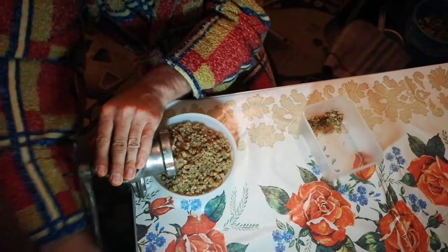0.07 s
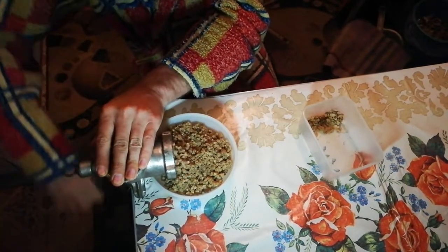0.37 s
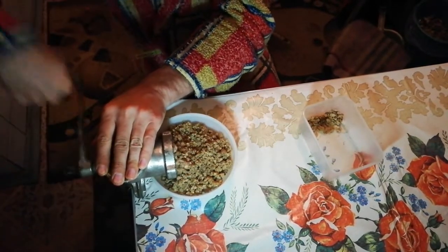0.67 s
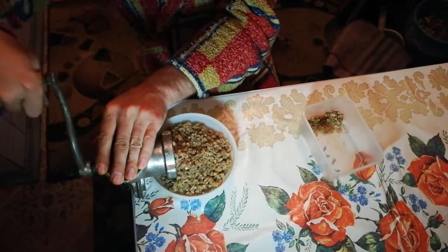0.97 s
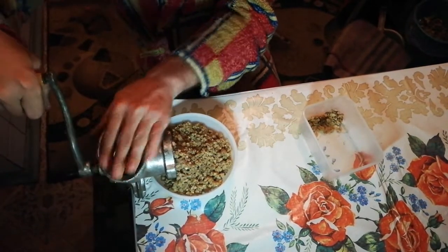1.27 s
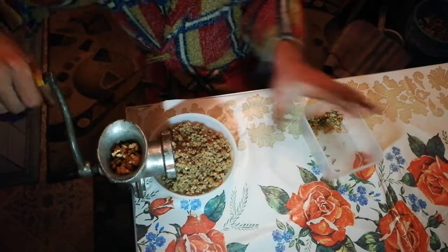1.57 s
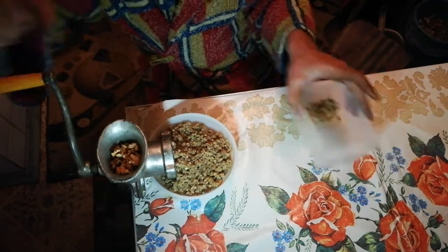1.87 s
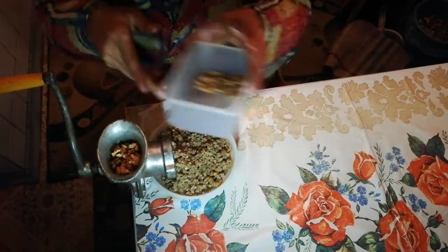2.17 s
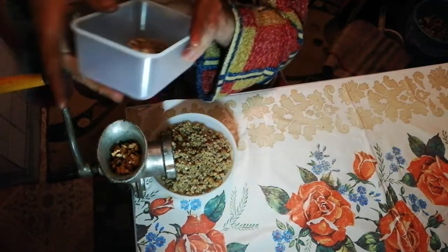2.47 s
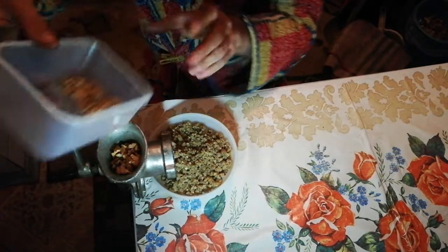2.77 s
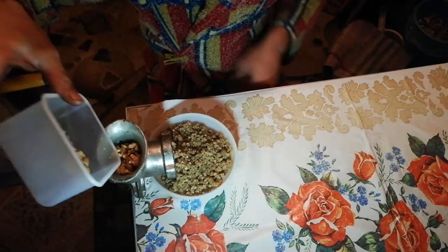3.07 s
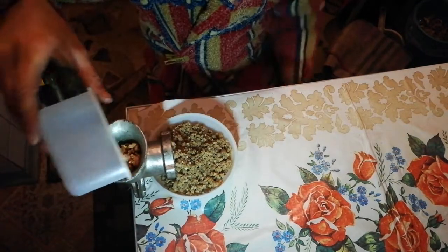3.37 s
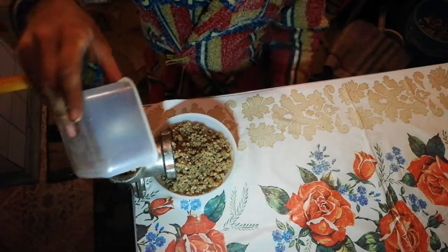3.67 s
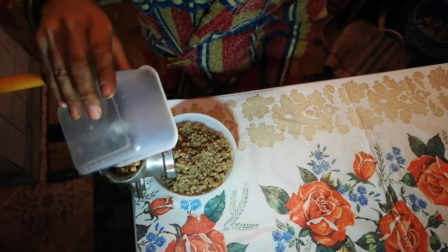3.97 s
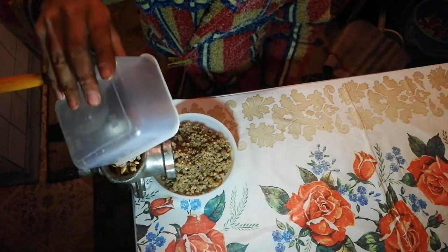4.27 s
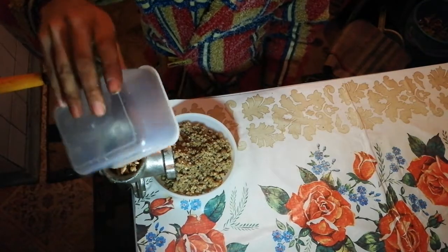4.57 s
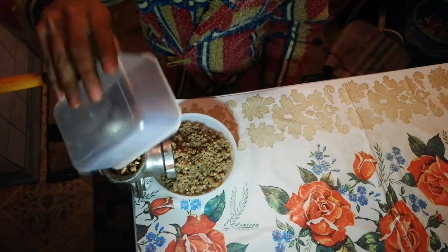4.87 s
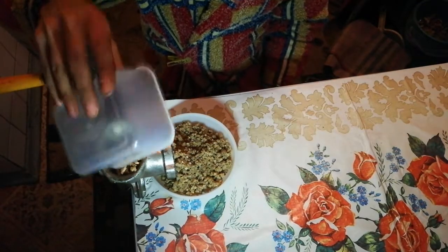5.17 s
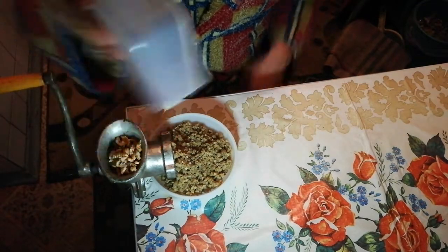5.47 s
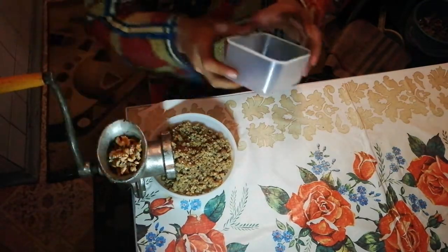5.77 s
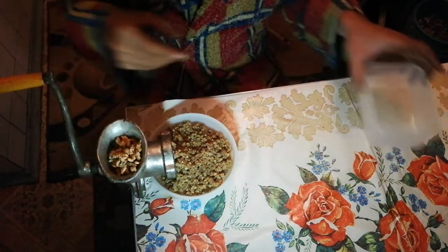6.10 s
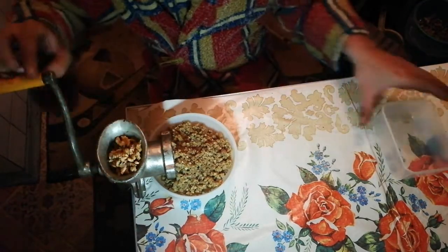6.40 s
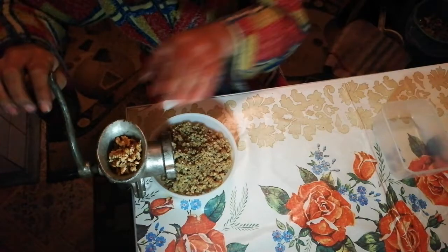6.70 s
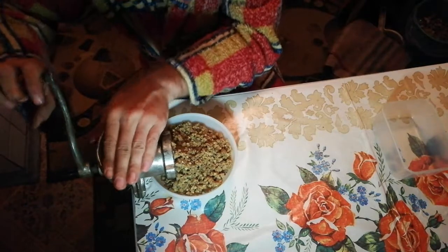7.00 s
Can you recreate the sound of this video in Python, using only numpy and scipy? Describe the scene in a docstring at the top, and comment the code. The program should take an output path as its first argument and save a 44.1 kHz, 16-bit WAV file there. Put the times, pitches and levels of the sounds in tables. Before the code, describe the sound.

For the first 1.5 seconds a hand-cranked grinder crushes walnuts in soft swells of crunching and low table rumble, with brittle cracks thickest around 0.9 seconds and a sleeve rustling close by. At 1.7 seconds a plastic tub is picked up with a light bump. Nuts shift inside it, then slide, click and rattle into the metal hopper, most strongly from 3.1 to 3.5 seconds, trailing off by 4.1. Between 4.6 and 5.2 seconds the tub is knocked on the hopper four times, hollow and briefly ringing, the last three loudest. A very faint low hum swells around 6 seconds. At 6.25 the tub lands on the cloth-covered table with a loud, hollow thud and a quick clack. Grinding resumes from 6.6 seconds, with a crack near 7.2. The stereo microphone is close, in a small, quiet kitchen with short reflections and a faint appliance hum.

```python
"""A cast meat grinder clamped to a kitchen table crushes walnuts: shells of sound rise with each push on the
crank, as brittle fracture and table rumble, while a sleeve rustles. From 1.7 s the cook lifts a plastic tub
and slides its nuts into the metal hopper; their impacts excite the thin wall. From 4.6 s four knocks set
the tub's modes ringing. A low drone swells, the tub lands on the cloth at 6.25 s, and cranking resumes.
A close stereo microphone hears it all, with the reflections of a small, quiet kitchen."""
import sys
import numpy as np
from scipy import signal
from scipy.fft import rfft, irfft
from scipy.io import wavfile
from scipy.ndimage import map_coordinates

SR = 44100
rng = np.random.default_rng(int(sys.argv[2]) if len(sys.argv) > 2 else 0)


def wav_record(signal):
    """Record a signal, one row per channel, as 16-bit PCM in the file named by sys.argv[1]."""
    frames = np.transpose(np.atleast_2d(signal))
    bounded = np.clip(frames, -1, 1)
    # unit amplitude maps onto the largest positive 16-bit level
    quanta = np.round(bounded * 32767).astype(np.int16)
    wavfile.write(sys.argv[1], SR, quanta)


N = 319284
TIME = np.arange(N) / SR
HIT_TIME = TIME[:SR // 2]


# Pushes on the crank: t/s of peak, build-up/s, rumble level/dB, crunch level/dB (all levels are relative)
PUSHES = [(.05, 0.38, -46.5, -58.5), (.27, 0.3, -53.5, -71), (.56, 0.24, -55.5, -61.5),
          (.92, 0.3, -44.5, -52.5), (1.29, 0.56, -52.5, -92), (1.5, 0.038, -64, -65),
          (6.6, 0.26, -63.5, -76), (7.01, 0.052, -63, -59), (7.09, 0.063, -57, -66),
          (7.23, .15, -52.5, -52)]
# Spectra of the table's rumble and the auger's crunch: f/Hz, level/dB
RUMBLE_SPECTRUM = [(25, -18), (55, -20), (90, -6.5), (135, 1.5), (190, -2.5), (260, -12), (450, -18),
                   (900, -66)]
CRUNCH_SPECTRUM = [(60, -35), (200, -12), (450, -10), (950, 7.5), (1700, 3.5), (2600, -4.5), (4200, -4),
                   (6500, -9), (12000, -52)]
def grinder():
    """Forced vibration: the auger loads the nuts until they give way, and shakes the table."""
    rumble = swells([(s, build_s, db) for s, build_s, db, _ in PUSHES], release_s=.16)
    crunch = swells([(s, build_s, db) for s, build_s, _, db in PUSHES], release_s=.067)
    out = unit(colour(rng.standard_normal(N), RUMBLE_SPECTRUM)) * rumble * undb(-5)
    out += unit(colour(grains(900, 3.8, N), CRUNCH_SPECTRUM)) * crunch * undb(-.5)
    return out + fractures() + table_sway()


# Nuts breaking and the crank knocking: t/s, level/dB, f/Hz
CRACKS = [(.291, -58, 1050), (.636, -52.5, 1200), (.648, -50, 1130), (.711, -53, 780), (.795, -57, 1400),
          (.838, -45, 2380), (.873, -48.5, 2840), (.888, -45.5, 1480), (.905, -47.5, 980),
          (1.102, -46.5, 820), (1.199, -49, 2190), (1.263, -45.5, 1130), (1.292, -54, 1510),
          (1.553, -48.5, 1480), (6.603, -63, 1700), (6.791, -64.5, 1780), (7.2, -44.5, 2420)]
# Dry, bright sprays of splinters: t/s, level/dB
SPLINTERS = [(.242, -52.5), (.886, -45), (6.903, -55), (7.201, -50.5)]
# Response of the casting and spectrum of a hard tick: f/Hz, level/dB
CASTING_RESPONSE = [(450, 4), (920, 4), (1150, 0), (1500, 2), (1900, 0), (2500, 0.5), (3200, 2.5),
                    (3800, 3.5), (4600, -3), (8000, -38)]
TICK_SPECTRUM = [(80, -43.5), (800, -5), (2500, -8), (4200, -1.5), (6000, -2), (8300, -2), (10500, -17),
                 (15500, -24.5)]
def fractures():
    """Brittle fracture: big pieces break low, crumble long and shake the table; small ones snap high."""
    out = np.zeros(N)
    for s, db, hz in CRACKS:
        force = contact(scatter_s=.018 / 2 ** (1.9 * octaves(hz)))
        crack = burst(colour(band(force, hz, width_share=1.1), CASTING_RESPONSE), db)
        tick = burst(colour(force, TICK_SPECTRUM), db - 21.5)
        add(out, s, crack + tick + thump(db - .5 - 2.5 * octaves(hz)))
    for s, db in SPLINTERS:
        add(out, s, burst(colour(contact(scatter_s=.011), TICK_SPECTRUM), db))
    return out


def table_sway(hz=62, t60_s=.25):
    """Damped free vibration: the table sways as a hard nut gives way."""
    out = np.zeros(N)
    sway = np.sin(2 * np.pi * hz * HIT_TIME) * undb(-60 * HIT_TIME / t60_s)
    add(out, s=.895, x=burst(sway, db=-40.5))
    return out


# Spectrum of the struck table top: f/Hz, level/dB
THUMP_SPECTRUM = [(30, -41.5), (55, -6.5), (95, -6), (140, 5), (210, -2.5), (330, -5.5), (520, -25.5),
                  (1200, -45)]
def thump(db):
    """Impact excitation: the table top answers a blow with a short, low boom."""
    return burst(colour(contact(scatter_s=.011), THUMP_SPECTRUM), db)


# Tub knocked on the hopper: t/s, blow level/dB, ring level/dB, rim tick level/dB, thump level/dB
KNOCKS = [(4.5998, -38.5, -36.5, -55.5, -59), (4.780, -26, -29.5, -36, -52.5),
          (4.9876, -24.5, -25, -38, -44.5), (5.198, -23.5, -33.5, -35, -45.5)]
# Spectra of the rim's tick and the blow of the tub's floor: f/Hz, level/dB
RIM_SPECTRUM = [(100, -43), (1500, -13.5), (3000, -3), (5000, 3), (8300, -4), (10500, -10), (15500, -24.5)]
BLOW_SPECTRUM = [(30, -26), (60, -18.5), (150, -26), (300, -7), (400, -3.5), (490, -13), (620, -3),
                 (1020, -1), (1480, -14.5), (2100, -7.5), (2600, -20.5), (4000, -23), (9000, -63)]
def knocks():
    """Elastic impact: the rim ticks on the hopper; the tub's floor flexes a moment later and rebounds."""
    out = np.zeros(N)
    for s, db, _, tick_db, thump_db in KNOCKS:
        add(out, s, burst(colour(contact(scatter_s=.003), RIM_SPECTRUM), tick_db) + thump(thump_db))
        add(out, s + .001, burst(colour(contact(), BLOW_SPECTRUM), db - 2))
        add(out, s + .004, burst(colour(contact(scatter_s=.0007), BLOW_SPECTRUM), db - 14))
    return out


# Tub bumped and set down on the cloth: t/s, blow level/dB, thump level/dB
LANDINGS = [(1.709, -51, -47), (2.178, -71, -55), (2.384, -54, -54.5), (6.2509, -24.5, -56.5),
            (6.257, -34.5, -39.5), (6.364, -34, -37.5)]
# Spectrum of a cushioned blow: f/Hz, level/dB
SOFT_BLOW_SPECTRUM = [(80, -10), (200, -1.5), (320, 5), (550, -1), (1000, 2.5), (1400, -1), (2000, -20),
                      (3500, -28), (8000, -30), (15000, -49)]
def landings():
    """Cushioned impact: cloth dulls the blow and the table booms; the rim clacks as the tub tips flat."""
    out = np.zeros(N)
    for s, db, thump_db in LANDINGS:
        add(out, s, burst(colour(contact(), SOFT_BLOW_SPECTRUM), db - 5) + thump(thump_db))
    rim_clack = tub_hit(db=-45, tick_db=-36, hz=2600, scatter_s=.0025)
    add(out, 6.3405, rim_clack)
    return out


# Modes of the tub held on the hopper and standing on the table: f/Hz, level/dB, t60/s
HELD_MODES = [(285, -19, .35), (398, 2, .27), (490, -16, .2), (608, -8, .27), (651, -10, .36),
              (720, -11, .3), (800, -8, .28), (976, -5, .26), (1220, -11, .2), (1570, -13, .2),
              (1690, -14, .18), (1820, -12, .2), (2130, -14, .18), (2815, -20, .2)]
STANDING_MODES = [(194.4, -2, 0.44), (326, 17, 0.12), (610, 5, 0.32), (790, 0, 0.42), (1017, -7, 0.42),
                  (1200, -8, 0.38), (1307, 5.5, 0.23)]
def tub_ringing():
    """Normal modes: the hollow tones that linger after a blow depend on how the tub is supported."""
    out = np.zeros((2, N))
    for s, _, ring_db, *_ in KNOCKS:
        add(out, s, ring(HELD_MODES, ring_db))
    for s, db, _ in LANDINGS:
        add(out, s, ring(STANDING_MODES, db - 6))
    return out


# Slides, one per tilt of the tub: t/s of peak, build-up/s, tumbling level/dB, hiss level/dB
SLIDES = [(1.86, 0.044, -54, -75), (1.933, 0.077, -47, -57), (2.291, 0.04, -54, -61.5),
          (2.42, 0.053, -46.5, -58), (2.55, 0.14, -56.5, -63.5), (3.03, 0.067, -53.5, -68),
          (3.12, 0.099, -48, -57.5), (3.225, 0.096, -38.5, -52), (3.49, 0.39, -47.5, -60),
          (3.589, 0.14, -51.5, -51), (3.831, 0.16, -49, -56.5), (3.914, 0.076, -53.5, -49),
          (4.06, .1, -68, -67)]
# A finger or a single nut strikes the tub: t/s, level/dB, f/Hz
TUB_CLICKS = [(1.901, -47, 1500), (1.961, -37, 1200), (2.551, -52.5, 1490), (3.078, -45, 2300),
              (3.138, -47, 935), (3.163, -36.5, 940), (3.173, -42.5, 3160), (3.192, -41.5, 2970),
              (3.221, -42, 3350), (3.232, -41, 3600), (3.297, -42.5, 2040), (3.341, -45, 1500),
              (3.658, -51, 960), (5.628, -64, 930), (5.827, -44, 1250)]
# A jolt lands a handful at once: t/s, wall level/dB, tick level/dB
CLATTERS = [(1.707, -48.5, -48.5), (2.179, -47, -62.5), (2.384, -42.5, -44), (3.003, -49, -52),
            (3.098, -50, -45), (3.383, -39.5, -38), (3.567, -54, -45.5), (5.708, -66, -65)]
TUMBLE_RELEASE_S = .12
def sliding_nuts():
    """Granular flow: kernels tumble along the tub wall, and friction makes their dry skins hiss."""
    tumble = swells([(s, build_s, db) for s, build_s, db, _ in SLIDES], TUMBLE_RELEASE_S)
    hiss = swells([(s, build_s, db) for s, build_s, _, db in SLIDES], release_s=.09)
    out = unit(tub_wall(kernels(), direct=.62)) * tumble * undb(-1.5)
    out += unit(colour(grains(1800, 6.6, N), TICK_SPECTRUM)) * hiss
    for s, db, hz in TUB_CLICKS:
        tick_db = db - 16 + 3.5 * octaves(hz)
        add(out, s, tub_hit(db, tick_db, hz, scatter_s=.0021))
    for s, db, tick_db in CLATTERS:
        add(out, s, tub_hit(db, tick_db, hz=1950, scatter_s=.014))
    return out


def kernels(count=16):
    """Size sets resonance: pieces of many sizes each click at their own pitch, the higher ones weaker."""
    pitches = np.geomspace(800, 5000, count) * np.exp(.068 * rng.standard_normal(count))
    gains = undb(-1.5 * np.log2(pitches / pitches[0]))
    return sum(unit(resonate(grains(55, 2.54, N), hz, .53 * hz)) * gain
               for hz, gain in zip(pitches, gains))


def tub_hit(db, tick_db, hz, scatter_s):
    """Hard impact: one force both drives the tub wall and radiates a tick."""
    force = contact(scatter_s)
    body = tub_wall(band(force, hz, width_share=1.75), direct=.34)
    return burst(body, db) + burst(colour(force, TICK_SPECTRUM), tick_db)


# Resonances of the thin tub wall: f/Hz, bandwidth/Hz, level/dB
WALL_MODES = [(812, 41, 6), (892, 78, 8), (1074, 135, 2), (1594, 180, 2.5), (1747, 80, -1.5),
              (2070, 300, -4.5), (2760, 290, -2.5), (3380, 190, -8), (3910, 140, -2.5)]
def tub_wall(force, direct):
    """Radiation efficiency: a thin wall emits little below its main modes; the cavity adds a low tone."""
    body = direct * force + sum(undb(db) * resonate(force, hz, width) for hz, width, db in WALL_MODES)
    cavity = undb(2) * resonate(force, hz=394, width_hz=30)
    return highpass(body, hz=720, order=4) + .12 * body + cavity


def cavity_hum(lifted_s=2.2):
    """Cavity resonance: once the tub is off the table, its air hums with the moving nuts."""
    tumble = swells([(s, build_s, db) for s, build_s, db, _ in SLIDES if s > lifted_s], TUMBLE_RELEASE_S)
    return unit(band(rng.standard_normal(N), hz=391.5, width_share=.22)) * tumble * undb(-19)


# Thin clinks as things are let go or settle: t/s, level/dB
CLINKS = [(1.554, -58), (2.180, -66), (6.342, -41.5)]
# Modes of a clink: f/Hz, level/dB, t60/s
CLINK_MODES = [(4850, -7, .015), (5130, -2, .025), (5405, 0, .03), (5620, -1, .025), (5790, -3, .02),
               (6632, -4, .012)]
def clinks():
    """Modal excitation: a light chatter drives a cluster of high, quickly damped modes."""
    out = np.zeros(N)
    for s, db in CLINKS:
        chatter = contact(scatter_s=.014)
        add(out, s, burst(signal.fftconvolve(chatter, ring(CLINK_MODES, 0)[0]), db))
    return out


# Sweeps of the arm: t/s of peak, build-up/s, level/dB
SWEEPS = [(.12, .4, -56.5), (.25, .15, -61), (.56, 0.2, -54), (.77, .2, -55.5), (6.96, 0.22, -63)]
# Spectra of rubbing fibres and of a snag: f/Hz, level/dB
FIBRE_SPECTRUM = [(100, -45), (1500, 0), (4000, -9.5), (6200, -13), (8500, -1.5), (11000, -10.5),
                  (15500, -18)]
SNAG_SPECTRUM = [(100, -50), (3000, -17.5), (8500, 0.5), (12000, -3), (15500, -6.5)]
def sleeve():
    """Friction: cloth close to the microphone gives a fine, grainy hiss of fibres, with small snags."""
    fibres = np.array([unit(colour(grains(1600, 4, N), FIBRE_SPECTRUM)) for _ in range(2)])
    snags = unit(colour(grains(30, 3.3, N), SNAG_SPECTRUM)) * undb(-9)
    return (fibres + snags) * swells(SWEEPS, release_s=.18)


# Crisp ticks of the sleeve: t/s, level/dB
CLOTH_TICKS = [(.069, -54), (.114, -53), (.242, -52.5), (.487, -59), (.67, -59), (.749, -54), (.772, -53.5)]
def cloth_ticks():
    """Stick-slip: single threads catch and let go, too near for the room to answer."""
    out = np.zeros(N)
    for s, db in CLOTH_TICKS:
        add(out, s, burst(colour(contact(scatter_s=.0014), SNAG_SPECTRUM), db))
    return ports(out, lead_ms=.25, pan_db_per_ms=5)


# Reverberation time of the kitchen: f/Hz, t60/s
KITCHEN_T60 = [(100, 0.51), (400, 0.38), (1200, 0.23), (4000, 0.22), (12000, 0.17)]
def kitchen(dry, wet_db):
    """Reverberation: dense reflections from the table and near walls; the treble is absorbed first."""
    hz, s, spectra = signal.stft(diffuse(len(HIT_TIME)), SR, nperseg=256)
    fade = undb(-60 * s / on_log_axis(KITCHEN_T60, hz)[:, None])
    onset = 1 - np.exp(-HIT_TIME / .00035)
    tail = signal.istft(spectra * fade, SR)[1][:, :len(HIT_TIME)] * onset
    tail *= undb(wet_db) / np.sqrt(np.sum(tail ** 2) / 2)
    return signal.fftconvolve(dry[None], tail, axes=1)[:, :N]


def drone():
    """Narrow-band noise: a low, wavering tone swells and fades."""
    tone = unit(band(rng.standard_normal(N), hz=152.2, width_share=.092))
    return tone * swell(peak_s=6, build_s=.7, release_s=2.5) * undb(-65)


# Spectrum of the room's air, and partials of a household appliance: f/Hz, level/dB
AIR_SPECTRUM = [(20, -20), (55, 4), (125, -2), (200, 2), (260, -7), (380, -7.5), (560, -15.5), (950, -9.5),
                (2500, -14.5), (8000, -17), (12500, -25), (15500, -25.5)]
APPLIANCE_HUM = [(124, -78), (350, -79)]
def room_tone():
    """Ambient noise: faint diffuse air under the steady hum of an appliance."""
    air = unit(np.array([colour(channel, AIR_SPECTRUM) for channel in diffuse(N)]))
    hum = sum(np.sqrt(2) * undb(db) * np.sin(2 * np.pi * hz * TIME) for hz, db in APPLIANCE_HUM)
    return air * undb(-64.5) + hum


def diffuse(size):
    """Diffuse field: noise from all sides, its bass coherent between the two microphone ports."""
    mid, side = rng.standard_normal((2, size))
    side = highpass(side, hz=330, order=2) + .024 * side
    return np.array([mid + side, mid - side]) / np.sqrt(2)


def ports(x, lead_ms, pan_db_per_ms):
    """Path difference: a source off centre reaches one microphone port earlier and louder."""
    return np.array([map_coordinates(x, [(TIME + side * lead_ms / 2000) * SR], order=3)
                     * undb(side * lead_ms * pan_db_per_ms / 2) for side in (1, -1)])


def ring(modes, db):
    """Modal decay after one blow; each mode reaches the two ports a quarter cycle apart."""
    out = 0
    port_phase = np.array([[1], [-1]]) * np.pi / 4
    for hz, mode_db, t60 in modes:
        stray_db, detune, side = rng.standard_normal(3)
        phase = 2 * np.pi * hz * (1 + .003 * detune) * HIT_TIME + np.sign(side) * port_phase
        out = out + undb(mode_db + stray_db - 60 * HIT_TIME / t60) * np.sin(phase)
    return burst(out * (1 - np.exp(-HIT_TIME / .003)), db)


def contact(scatter_s=0):
    """Impulsive force: one sharp contact, then smaller ones dying with time constant scatter_s."""
    force = signal.unit_impulse(len(HIT_TIME))
    if scatter_s > 0:
        force += .7 * grains(4500, 1.8, len(force)) * np.exp(-HIT_TIME / scatter_s)
    return force


def grains(per_s, spread_db, size):
    """Shot noise: random clicks, mostly small and a few large."""
    strength = undb(spread_db * np.minimum(rng.exponential(size=size), 4))
    return (rng.random(size) < per_s / SR) * strength * rng.choice([-1, 1], size)


def swell(peak_s, build_s, release_s):
    """Gaussian rise of 20 dB over build_s, then exponential decay of 20 dB per release_s."""
    return undb(-20 * np.where(TIME < peak_s, ((peak_s - TIME) / build_s) ** 2,
                               (TIME - peak_s) / release_s))


def swells(rows, release_s):
    """Incoherent sum: the powers of overlapping swells add."""
    return np.sqrt(sum((undb(db) * swell(s, build_s, release_s)) ** 2 for s, build_s, db in rows))


def resonate(x, hz, width_hz):
    """Two-pole resonator."""
    return signal.lfilter(*signal.iirpeak(hz, hz / min(width_hz, SR / 4), fs=SR), x)


def band(x, hz, width_share):
    """Two resonators in cascade favour one band."""
    return resonate(resonate(x, hz, width_share * hz), hz, width_share * hz)


def highpass(x, hz, order):
    """Maximally flat high-pass."""
    return signal.sosfilt(signal.butter(order, hz, "high", fs=SR, output="sos"), x)


def colour(x, spectrum, size=4096):
    """Minimum-phase filter with the given spectrum."""
    db = on_log_axis(spectrum, np.fft.rfftfreq(size, 1 / SR))
    cepstrum = irfft(db * np.log(10) / 20)
    cepstrum[1:size // 2] *= 2
    cepstrum[size // 2 + 1:] = 0
    return signal.fftconvolve(x, irfft(np.exp(rfft(cepstrum))))[:len(x)]


def on_log_axis(points, hz):
    """Interpolate (f/Hz, value) points over log frequency."""
    f, value = np.transpose(points)
    return np.interp(np.log(np.maximum(hz, 1)), np.log(f), value)


def octaves(hz):
    """Octaves above 1 kHz."""
    return np.log2(hz / 1000)


def undb(db):
    """Decibels to gain."""
    return 10 ** (np.asarray(db) / 20)


def unit(x):
    """Scale to rms 1."""
    return x / np.sqrt(np.mean(x ** 2))


def burst(x, db, window_s=.022):
    """Equal energy: scale a short sound to match the level db held for window_s."""
    return x * undb(db) * np.sqrt(window_s * SR / (np.mean(x ** 2) * x.shape[-1]))


def add(track, s, x):
    """Mix x into the track at s seconds."""
    i = int(s * SR)
    track[..., i:i + x.shape[-1]] += x[..., :N - i]


# Path of the tub: t/s, lead at the left port/ms
TUB_PATH = [(1.7, -0.12), (2.0, -0.00031), (2.2, -0.17), (2.4, 0.23), (3.3, .2), (4.7, .13), (5.2, 0.104),
            (5.8, 0.043), (6.25, -0.12)]
def scene():
    """Superposition: a fixed grinder and a moving tub, their reflections, and the background."""
    mill, cloth = grinder(), sleeve()
    pouring, knocking, set_down = sliding_nuts() + cavity_hum(), knocks(), landings() + clinks()
    tub_lead_ms = np.interp(TIME, *np.transpose(TUB_PATH))
    direct = ports(mill, lead_ms=-.05, pan_db_per_ms=40)
    direct += ports(pouring + knocking + set_down, tub_lead_ms, pan_db_per_ms=3)
    sources = (mill + cloth[0], pouring, knocking, set_down)
    reflections = sum(kitchen(source, wet_db=1.2) for source in sources)
    direct += cloth + cloth_ticks()
    return direct * undb(.6) + reflections + tub_ringing() + room_tone() + drone()


def record(dry, top_hz=16000):
    """Band limiting: a steep low-pass removes the highest treble."""
    return signal.sosfilt(signal.ellip(10, .2, 70, top_hz, fs=SR, output="sos"), dry)


dry = scene()
out = record(dry)
wav_record(out)
```